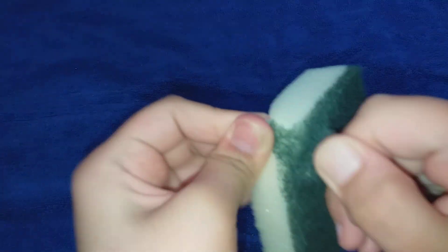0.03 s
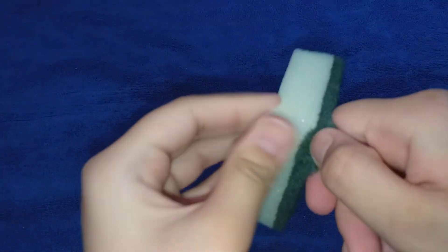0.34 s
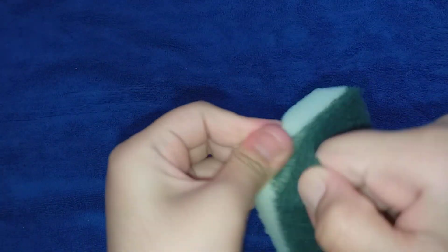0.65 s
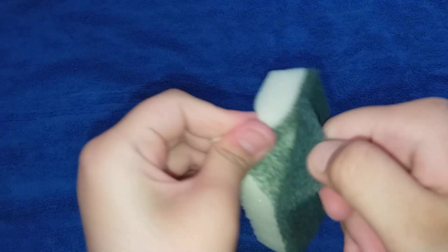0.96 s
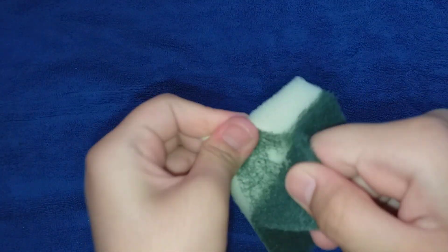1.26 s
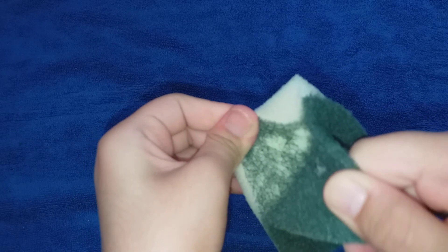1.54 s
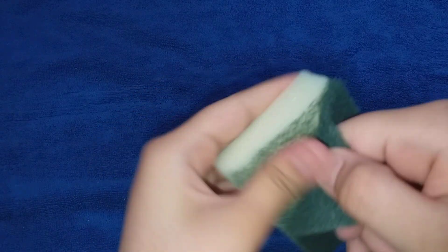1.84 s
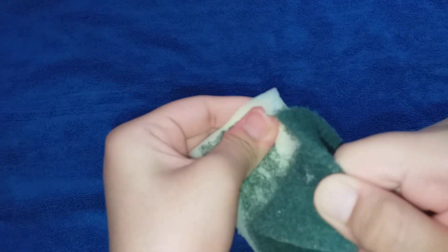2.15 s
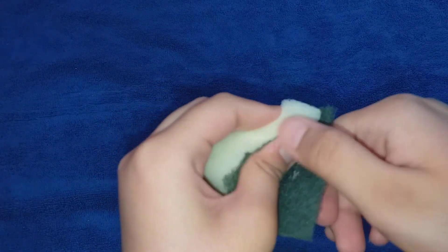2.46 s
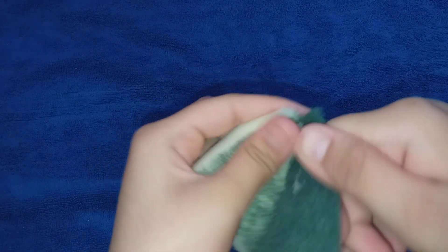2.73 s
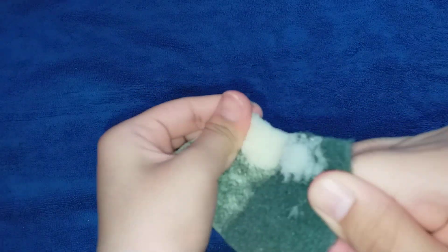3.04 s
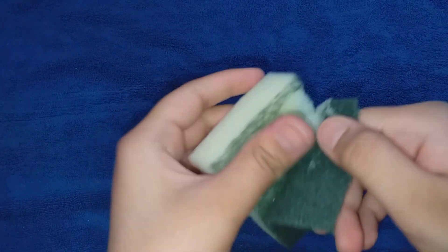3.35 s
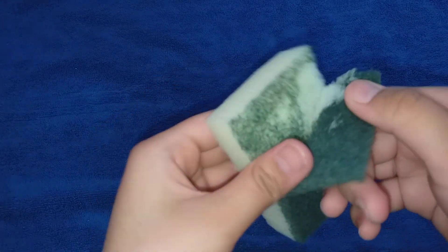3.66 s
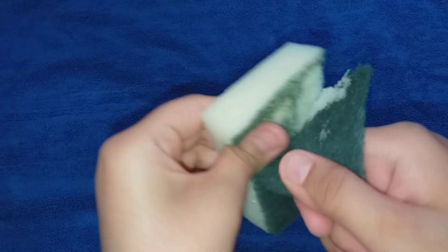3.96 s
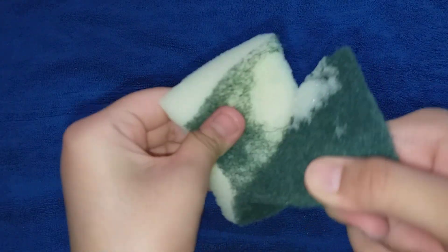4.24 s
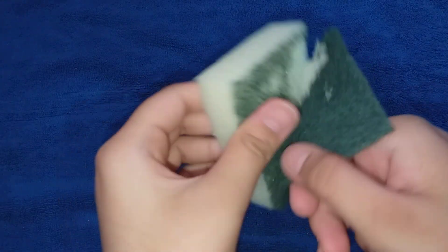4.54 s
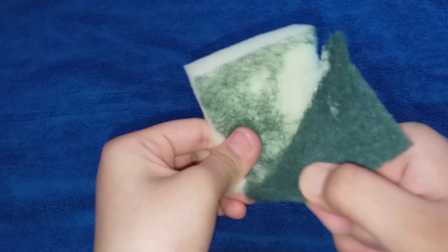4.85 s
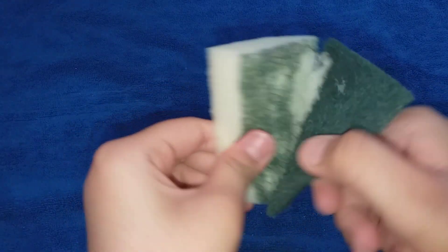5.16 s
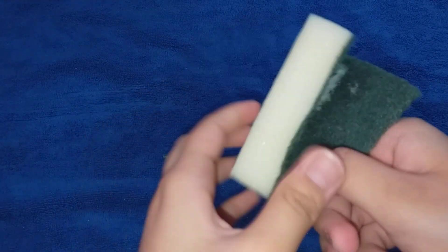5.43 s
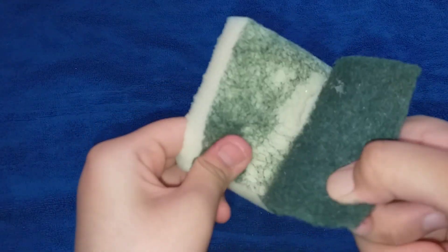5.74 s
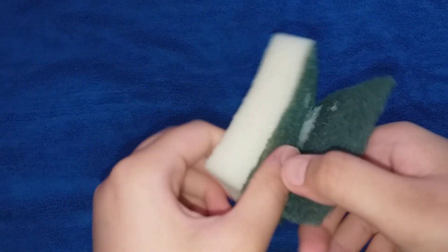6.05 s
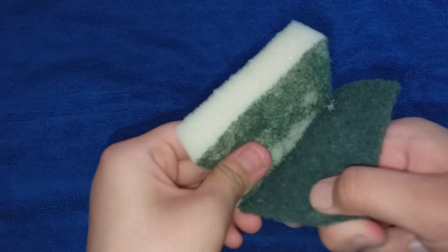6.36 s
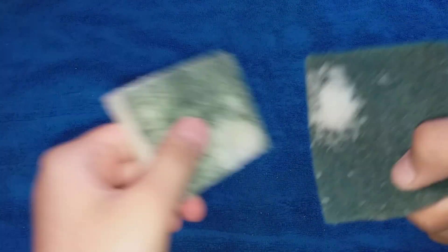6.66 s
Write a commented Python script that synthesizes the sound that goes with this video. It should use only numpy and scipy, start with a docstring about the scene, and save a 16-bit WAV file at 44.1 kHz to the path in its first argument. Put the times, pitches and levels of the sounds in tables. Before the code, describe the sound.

In a small quiet room, a close microphone picks up fingers softly rubbing a dry sponge. Then its rough scouring layer tears away from the foam in eight brief, scratchy rips, a little under a second apart, each full of tiny snaps. Faint rustles and fingertip taps fill the gaps, and a soft thump ends the final pull as the pieces separate. A slight low hum and hiss lie underneath.

```python
"""A small quiet room, microphone close on two hands peeling the scouring pad off a dry foam sponge.
In each of eight pulls fibres snap, singly at first, then in a dense crackle; every break also rings
the taut pad and jolts the foam. Between pulls the fingers shift their grip, scratching, rubbing and
tapping. At the end the pad comes free with a soft thump. A low drone and faint hiss lie underneath."""
import sys
import numpy as np
from scipy import signal
from scipy.fft import rfft, irfft
from scipy.io import wavfile
from scipy.ndimage import uniform_filter1d

SR = 44100
rng = np.random.default_rng(int(sys.argv[2]) if len(sys.argv) > 2 else 0)


def persist_wave(psi):
    """Save psi, clipped to +-1, as 16-bit WAV."""
    counts = np.round(np.clip(psi, -1, 1) * 32767).astype(np.int16)
    wavfile.write(sys.argv[1], SR, np.atleast_2d(counts).T)


N = 295470
TIME = np.arange(N) / SR

# Levels in the tables are relative: each source sets its own gain on top.
# swell of the room's drone: t/s, level/dB
DRONE_SWELL = [(0.0, -67), (2.56, -68), (3.08, -63), (3.53, -66), (4.05, -61.5), (4.64, -66), (4.87, -56.5),
               (5.24, -63.5), (5.62, -60.5), (5.84, -67.5), (6.7, -65.5)]
# spectra of the room tone, drone and hiss: f/Hz, level/dB
DRONE_COLOUR = [(20, -37), (32, -43), (50, -13.5), (66, -7.5), (80, -7.5), (97, -2.5), (108, -3),
                (120, 4.5), (145, -3), (190, -13.5), (280, -18.5), (500, -49)]
HISS_COLOUR = [(300, 5.5), (500, 0), (800, -2.5), (1500, -9.5), (3000, -11), (3900, -2.5), (6000, -10),
               (9000, -15), (11500, -7), (15000, -3.5)]
# fingers slide over the sponge: middle/s, length/s, scratch on the pad/dB, rub on the foam re scratch/dB
STROKES = [(0.0, 0.076, -63.5, -4.5), (0.354, 0.052, -67, -8), (0.455, 0.065, -62.5, -7),
           (0.583, 0.055, -61.5, -24), (0.987, 0.085, -74, -1), (1.234, 0.057, -71, -4),
           (1.678, 0.073, -67.5, -12), (1.792, 0.11, -65.5, -4.5), (1.931, 0.063, -60, -6.5),
           (2.62, 0.036, -63, -5), (2.713, 0.067, -61.5, -0.5), (2.81, 0.09, -66, -5),
           (3.23, 0.23, -67, -7), (3.359, 0.036, -64, -12), (3.444, 0.053, -62.5, -10),
           (3.63, 0.063, -61, -3.5), (3.755, 0.06, -58.5, -7.5), (3.87, 0.25, -72.5, -0.5),
           (4.42, 0.17, -65.5, -12), (4.625, 0.14, -65, -5.5), (4.786, 0.048, -58, -10),
           (5.14, 0.2, -68.5, -18), (5.435, 0.061, -59.5, -6.5), (5.485, 0.041, -57.5, -6),
           (5.576, 0.043, -56.5, -1), (5.97, 0.28, -69, -15), (6.147, 0.038, -60.5, -3),
           (6.213, 0.05, -55, -1.5), (6.305, 0.088, -58.5, -4), (6.69, 0.17, -61, -8)]
# the thumb drags over bare foam before the first pull: t/s, level/dB
THUMB_DRAG = [(.05, -85), (.11, -73.5), (.3, -71.5), (.36, -95)]
# fingertips land on the sponge: t/s, level/dB
TAPS = [(1.81, -65), (2.61, -66), (2.69, -53), (2.735, -66.5), (3.352, -55), (3.609, -62), (4.58, -60),
        (6.131, -64), (6.265, -65)]
# spectra of skin scratching the pad, rubbing the foam and tapping: f/Hz, level/dB
SCRATCH_COLOUR = [(900, -28.5), (2000, -5.5), (3000, -2.5), (3900, 1.5), (5500, -1.5), (7800, -2),
                  (9200, -11), (16000, -9)]
RUB_COLOUR = [(120, -5.5), (300, 2.5), (430, 2.5), (570, 0), (780, -5.5), (1000, -2), (1400, -7.5),
              (2200, -7), (5000, -50)]
TAP_COLOUR = [(100, -9), (300, 3.5), (550, -2), (1000, -5), (1600, -21), (2300, 3), (3200, -4), (8000, -21),
              (16000, -43)]
# the pulls: start/s, end/s, peak crackle of straining fibres/dB, hollow between the hands f/Hz,
# hollow re foam/dB, fine fibres re coarse/dB
PULLS = [(0.634, 0.867, -44, 750, -10.5, -9.5), (1.296, 1.6, -40, 760, -6, -8.5),
         (2.021, 2.24, -40.5, 870, -13, -10), (2.816, 3.134, -50.5, 840, -6, -3),
         (3.972, 4.214, -40, 870, 1.5, -10), (4.783, 5.022, -41.5, 830, -4, -11.5),
         (5.552, 5.826, -38, 820, -7, -9.5), (6.303, 6.545, -45, 770, -19, -20)]
# strong fibre bundles give way at once: t/s, crack/dB, pad ring re crack/dB, foam body re crack/dB
SNAPS = [(0.614, -48, -12, -28), (0.638, -44, -15, -29), (0.664, -36.5, -13, -30), (0.678, -30.5, -22, -25),
         (1.309, -48.5, -20, -19), (1.318, -38, -13, -8.5), (1.343, -31.5, -4, -12), (1.397, -31, -6, -13),
         (1.505, -38, -8, -19), (1.515, -35, -1, -2), (1.529, -45, 0, -4), (1.545, -41.5, -7, -19),
         (2.032, -51, -13, -22), (2.053, -44.5, 0.5, -21), (2.102, -37, 2, -22.5), (2.121, -32.5, 2.5, -25),
         (2.141, -32, 3, -22), (2.167, -31.5, 7, -4), (2.183, -34.5, -1, -4), (2.218, -43.5, -1, -11),
         (2.838, -49.5, -25, -27), (2.861, -45, -18, -13), (2.894, -36.5, -11, -15), (2.912, -43, -20, -24),
         (2.934, -38.5, 2, -15), (3.055, -45.5, 3.5, -9), (3.078, -42.5, 3.5, -14),
         (3.097, -45.5, -15, -20), (3.981, -45, -12, -14), (4.013, -32, -13, -15.5), (4.037, -36, -10, -13),
         (4.17, -29, -2, -15), (4.219, -29, -10, -8), (4.81, -33.5, -26, -13.5), (4.851, -33.5, -15, -27),
         (4.869, -30, -14, -18), (4.898, -33, 2, -14), (4.92, -28.5, -9, -14), (4.938, -29, -16, -22),
         (4.948, -28, 3, -18), (4.981, -29, -16, -15), (5.584, -45, -7, -15), (5.608, -40, -6, -16),
         (5.632, -26.5, -9, -16.5), (5.73, -26.5, -20, -14), (5.783, -30, -19, -12.5),
         (6.323, -44.5, -13, -11), (6.34, -37.5, -20, -9.5), (6.363, -36, -7, -8.5), (6.411, -34, -9, -14),
         (6.433, -29.5, -14, -11.5), (6.452, -28.5, -2, -15)]
# the seam gives and the tear runs: start/s, length/s, crackle/dB, pad re crackle/dB, foam re crackle/dB
RUNS = [(0.67, 0.023, -34.5, -10, -20), (0.703, 0.011, -35, -5.5, -10), (0.763, 0.055, -30, -2, -9),
        (1.347, 0.014, -37, -3, -10.5), (1.424, 0.041, -30, -4, -8.5), (2.09, 0.066, -38, -1.5, -11),
        (2.913, 0.028, -40, -5, -12), (2.947, 0.034, -35.5, 3.5, -12.5), (4.05, 0.054, -33.5, -4, -13),
        (4.17, 0.043, -27, -4.5, -10.5), (4.863, 0.042, -38, -5, -15.5), (4.943, 0.048, -30, -4, -9.5),
        (5.637, 0.02, -39, -3, -10.5), (5.676, 0.017, -30, -5, -13.5), (5.725, 0.02, -33, -7, -12),
        (6.38, 0.0078, -37, -5, -10.5), (6.457, 0.02, -32.5, -5, -17.5), (6.489, 0.036, -25, -6, -12.5)]
# spectra of coarse fibres, fine fibres and jolted foam: f/Hz, level/dB
COARSE_COLOUR = [(1200, -32.5), (2200, -9.5), (3200, -3), (3750, 1), (4300, -1.5), (5600, -2), (6600, -1.5),
                 (8000, 0), (9000, -9), (10400, -6.5), (12500, -9), (16000, -10)]
FINE_COLOUR = [(5000, -25.5), (9500, -8), (12500, -4.5), (16000, -1)]
FOAM_COLOUR = [(30, -39), (70, -5.5), (170, -11), (290, -1), (400, -0.5), (620, -2.5), (850, -2),
               (1130, -3.5), (1550, 1), (1900, -2), (2400, -15.5), (5000, -44)]
# resonances of the taut pad: f/Hz, width/Hz, level/dB
PAD_MODES = [(2330, 195, -1.5), (2564, 285, -3), (2916, 303, 3.5), (3310, 680, -2)]
# the foam springs back as the pad comes free: t/s, level/dB
RELEASE = [(6.532, -26)]
# modes of the loose foam block: f/Hz, level/dB, t60/s
BLOCK_MODES = [(156, -13, 0.037), (235, 0, 0.027), (730, 4, 0.013), (1420, -21, 0.0097)]

STRAIN_PAD_DB, STRAIN_FOAM_DB = -7, -12   # drive to pad and foam re the straining fibres
TAUTEN_DB = 2   # pad and foam answer this much less as a pull begins, this much more as it ends


def from_db(db):
    """Decibels to gain."""
    return 10 ** (np.asarray(db) / 20)


def unit_rms(x):
    """Scale to unit rms."""
    return x / np.sqrt(np.mean(x ** 2) + 1e-20)


def gain_curve(rows):
    """Gain at every sample from rows of t/s, level/dB."""
    return from_db(np.interp(TIME, *np.transpose(rows)))


def coloured(x, spectrum, size=8192):
    """Give a white signal a spectrum through a minimum-phase filter, keeping its power."""
    hz, db = np.transpose(spectrum)
    bin_hz = np.maximum(np.arange(size // 2 + 1) * SR / size, 1)
    gains = from_db(np.interp(np.log(bin_hz), np.log(hz), db))
    cepstrum = irfft(np.log(gains))
    cepstrum[1:size // 2] *= 2
    cepstrum[size // 2 + 1:] = 0
    impulse = unit_rms(irfft(np.exp(rfft(cepstrum)))) / np.sqrt(size)
    return signal.oaconvolve(x, impulse)[:N]


def resonance(x, hz, width_hz):
    """Two-pole resonance that keeps the power of a white input."""
    r = np.exp(-np.pi * width_hz / SR)
    feedforward = np.sqrt((1 - r * r) / 2) * np.array([1, 0, -1])
    feedback = [1, -2 * r * np.cos(2 * np.pi * hz / SR), r * r]
    return signal.lfilter(feedforward, feedback, x + 1e-18)


def blend(x, other, db):
    """Mix in an unrelated sound of the same power, db louder, and keep the total power."""
    return (x + from_db(db) * other) / np.hypot(1, from_db(db))


def room_tone():
    """A low drone that swells and sinks under faint hiss."""
    drone = from_db(3) * gain_curve(DRONE_SWELL) * coloured(rng.standard_normal(N), DRONE_COLOUR)
    hiss = from_db(-68) * coloured(rng.standard_normal(N), HISS_COLOUR)
    return drone + hiss


def crackle(per_s, spread_db, even_s, slips_per_s, slip_s, slip_db):
    """Tiny uneven breaks; each slip starts an avalanche that dies away. Power is about 1 over even_s."""
    slips = rng.random(N) < slips_per_s / SR
    since_slip = TIME - np.maximum.accumulate(TIME * slips)
    size_db = spread_db * np.minimum(rng.exponential(1, N), 3)
    avalanche_db = slip_db * np.exp(-since_slip / slip_s)
    clicks = from_db(size_db + avalanche_db) * rng.choice([-1, 1], N) * (rng.random(N) < per_s / SR)
    local_power = np.abs(uniform_filter1d(clicks ** 2, int(even_s * SR)))
    return clicks / np.sqrt(local_power + 1e-9)


def finger_strokes(edge_db=4.5):
    """Strokes swell and fade over the faint stir of holding: gains for scratch and rub."""
    power = np.outer(from_db([-75, -84.5]) ** 2, np.ones(N))   # the fingers never lie quite still
    for middle, length, db, rub_db in STROKES:
        span = np.abs(TIME - middle) < 2 * length
        scratch_db = db - edge_db * (2 * (TIME[span] - middle) / length) ** 2
        power[:, span] += from_db([scratch_db, scratch_db + rub_db]) ** 2
    return np.sqrt(power)


def handling():
    """Skin catches on the pad in fine ticks, rubs dully on the foam and lands on it in soft taps."""
    scratch_gain, rub_gain = finger_strokes()
    catches = crackle(per_s=11000, spread_db=3, even_s=0.066, slips_per_s=33, slip_s=0.0028, slip_db=7)
    scratch = coloured(from_db(-0.44) * scratch_gain * catches, SCRATCH_COLOUR)
    rub = coloured(from_db(-2) * rub_gain * catches, RUB_COLOUR)
    thumb = resonance(resonance(catches, hz=560, width_hz=160), hz=570, width_hz=220)
    drag = gain_curve(THUMB_DRAG) * unit_rms(thumb)
    presses = sum(from_db(db) * (TIME > s) * np.exp(-np.abs(TIME - s) / 0.0059) for s, db in TAPS)
    taps = coloured(presses * catches, TAP_COLOUR)
    return scratch + rub + drag + taps


def bundle_snaps(snaps, span_s=0.0023, scatter_s=0.0015, spread_db=4.2, count=18):
    """A bundle goes in a cascade of breaks, over in milliseconds: drives for fibre, pad and foam."""
    drives = np.zeros((3, N))
    for s, db, pad_db, foam_db in snaps:
        lags = scatter_s * rng.exponential(1, count)
        draw = rng.standard_normal(count)
        sizes = np.sign(draw) * from_db(spread_db * np.abs(draw)) * np.exp(-0.5 * lags / scatter_s)
        sizes *= np.sqrt(span_s * SR / np.sum(sizes ** 2))   # the energy of span_s at unit power
        gains = from_db([db, db + pad_db, db + foam_db])
        drives[:, ((s + lags) * SR).astype(int)] += np.outer(gains, sizes)
    return drives


def stray_snaps(per_s=40, offset_db=-2.5, spread_db=4, sag_db=10.5):
    """Lesser bundles go at random, weaker at both ends of a pull: rows like those of SNAPS."""
    rows = []
    for start, end, db, *_ in PULLS:
        for when, size in rng.random((int(per_s * (end - start)), 2)):
            progress = 2 * when - 1
            taut_db = TAUTEN_DB * progress
            crack_db = db + offset_db - sag_db * progress ** 2 + spread_db * (2 * size - 1)
            s = start + when * (end - start)
            rows.append((s, crack_db, STRAIN_PAD_DB + taut_db, STRAIN_FOAM_DB + taut_db))
    return rows


def strain(sag_db=22.5):
    """The strain swells and fades over each pull: powers for fibre, pad and foam."""
    power = np.zeros((3, N))
    for start, end, db, *_ in PULLS:
        span = slice(int(start * SR), int(end * SR))
        progress = np.linspace(-1, 1, len(TIME[span]))
        fibre_db = db - sag_db * progress ** 2
        body_db = fibre_db + TAUTEN_DB * progress
        power[:, span] += from_db([fibre_db, body_db + STRAIN_PAD_DB, body_db + STRAIN_FOAM_DB]) ** 2
    return power


def seam_runs(attack_db_per_s=950, decay_db_per_s=650, foam_growth_db=3.5):
    """A run starts sharply, holds as the foam joins in, and dies: powers for fibre, pad and foam."""
    power = np.zeros((3, N))
    for start, length, db, pad_db, foam_db in RUNS:
        span = slice(int((start - 0.05) * SR), int((start + 0.25) * SR))
        t = TIME[span] - start
        fibre_db = db - attack_db_per_s * np.maximum(-t, 0) - decay_db_per_s * np.maximum(t - length, 0)
        growth_db = foam_growth_db * (np.clip(t / length, 0, 1) - 0.5)
        power[:, span] += from_db([fibre_db, fibre_db + pad_db, fibre_db + foam_db + growth_db]) ** 2
    return power


def stalls(stall_s=0.006, depth_db=-3):
    """The tear hangs for a moment on each strong bundle before it gives way: a dip in gain."""
    gain = np.ones(N)
    for s, *_ in SNAPS:
        gain[int((s - stall_s) * SR):int(s * SR)] = from_db(depth_db)
    return gain


def fibre_ticks(breaks, q=6.4, ping_db=-0.5, count=16):
    """Each break is a tick plus the brief ping of a fibre with a length of its own."""
    which_fibre = rng.integers(0, count, N)
    fibre_hz = np.linspace(3200, 15000, count)
    pings = sum(resonance(breaks * (which_fibre == k), hz, hz / q) for k, hz in enumerate(fibre_hz))
    return blend(breaks, pings, ping_db)


def pad_ring(breaks):
    """The stretched pad rings briefly with every break, its modes alternating in sign."""
    gains = from_db([db for _, _, db in PAD_MODES])
    modes = [(-1) ** k * resonance(breaks, hz, width) for k, (hz, width, _) in enumerate(PAD_MODES)]
    return gains @ np.array(modes) / np.linalg.norm(gains)


def tearing():
    """The same breaks sound through fibres, pad, foam and the hollow between the hands."""
    attached = TIME < RELEASE[0][0] + 0.003
    fibre_gain, pad_gain, foam_gain = np.sqrt(strain() + seam_runs()) * attached
    speed = (fibre_gain / from_db(-32)) ** 0.7   # a faster tear breaks more fibres; its avalanches merge
    breaks = stalls() * crackle(per_s=1400 + 9000 * speed, spread_db=3.5, even_s=0.017,
                                slips_per_s=160, slip_s=0.0034, slip_db=16.6 / (1 + 0.5 * speed))
    crack, twang, jolt = bundle_snaps(SNAPS + stray_snaps())
    ticks = fibre_ticks(from_db(-2) * fibre_gain * breaks + from_db(-0.54) * crack)
    coarse, fine = coloured(ticks, COARSE_COLOUR), coloured(ticks, FINE_COLOUR)
    thuds = from_db(-2.5) * foam_gain * breaks + from_db(-1.5) * jolt
    foam = coloured(thuds, FOAM_COLOUR)
    tear = pad_ring(pad_gain * breaks + from_db(3.5) * twang)
    for start, end, _, hollow_hz, hollow_db, fine_db in PULLS:
        held = (TIME > start - 0.1) & (TIME < end + 0.1)
        hollow = resonance(thuds, hollow_hz, width_hz=290)
        tear += held * (blend(coarse, fine, fine_db) + blend(foam, hollow, hollow_db))
    return tear


def release_thump():
    """The freed foam block wobbles for a few cycles, without deep bass."""
    wobble = np.zeros(N)
    for s, db in RELEASE:
        t = np.maximum(TIME - s, 0)
        for hz, mode_db, t60 in BLOCK_MODES:
            wobble += from_db(db + mode_db - 60 * t / t60) * np.sin(2 * np.pi * hz * t)
    return signal.sosfilt(signal.butter(3, 110, "high", fs=SR, output="sos"), wobble + 1e-18)


def near_echoes(x, echo_db=-10, fade_s=0.003, count=24):
    """Hands and table throw each sound back to the microphone within a few milliseconds."""
    lags = np.linspace(0.0006, 3 * fade_s, count) * rng.uniform(0.85, 1.15, count)
    echoes = np.zeros(SR // 10)
    echoes[(lags * SR).astype(int)] = np.exp(-lags / fade_s) * rng.choice([-1, 1], count)
    return from_db(echo_db) * signal.oaconvolve(x, echoes / np.linalg.norm(echoes))[:N]


def room_echoes(x, t60=0.26, wet_db=-13.5, treble_db=-3.5, split_hz=6700, delay_s=0.0048, build_s=0.0067):
    """Diffuse echoes build up after the first wall and die away, a little weaker in the treble."""
    t = np.maximum(TIME[:SR // 2] - delay_s, 0)
    bands = [signal.butter(6, split_hz, kind, fs=SR, output="sos") for kind in ("low", "high")]
    low, high = [signal.sosfilt(band, rng.standard_normal(len(t))) for band in bands]
    envelope = (1 - np.exp(-t / build_s)) * from_db(-60 * t / t60)
    tail = (low + from_db(treble_db) * high) * envelope
    return from_db(wet_db) * signal.oaconvolve(x, tail / np.linalg.norm(tail))[:N]


def scene():
    """The sponge close up, its echoes and the room tone behind it, in mono."""
    sponge = tearing() + release_thump() + handling()
    return (sponge + near_echoes(sponge) + room_echoes(sponge) + room_tone())[None]


def record(dry):
    """The deepest bass is cut away; the top is cut steeply."""
    bass_cut = signal.butter(3, 38, "high", fs=SR, output="sos")
    top_cut = signal.ellip(12, 0.1, 70, 15900, fs=SR, output="sos")
    return signal.sosfilt(top_cut, signal.sosfilt(bass_cut, dry))


dry = scene()
out = record(dry)
persist_wave(out)
```